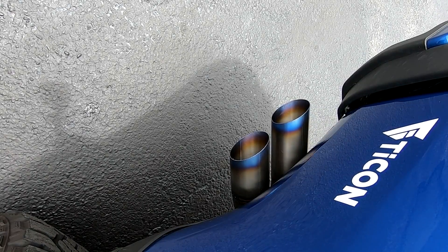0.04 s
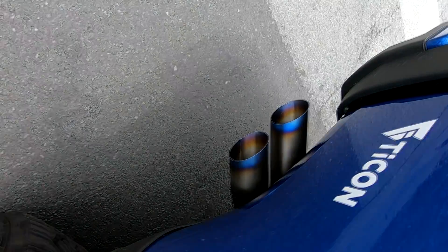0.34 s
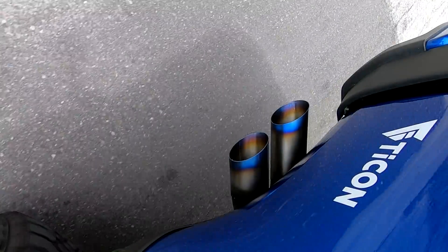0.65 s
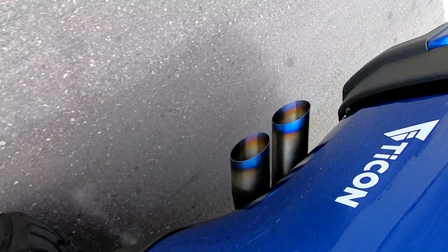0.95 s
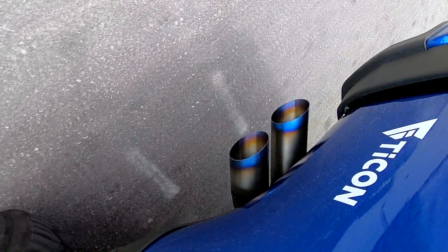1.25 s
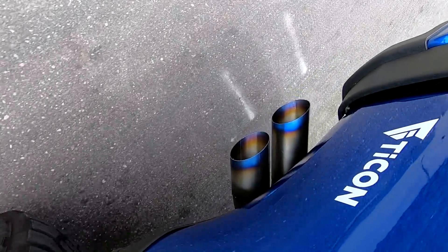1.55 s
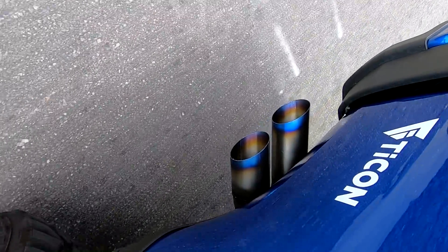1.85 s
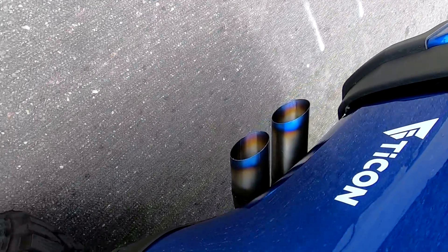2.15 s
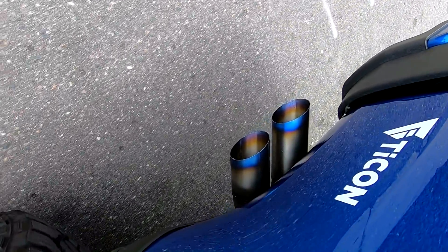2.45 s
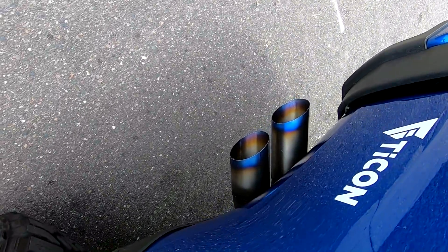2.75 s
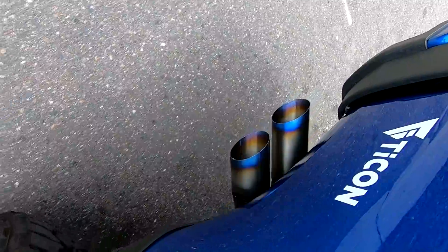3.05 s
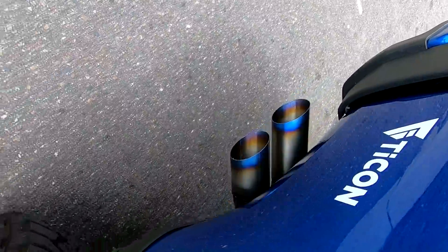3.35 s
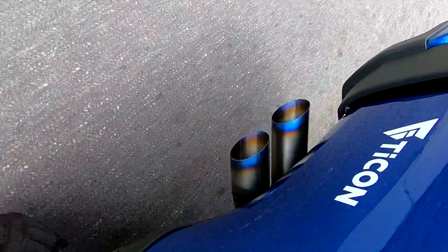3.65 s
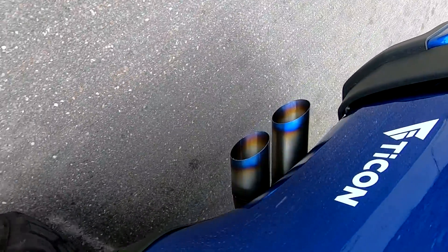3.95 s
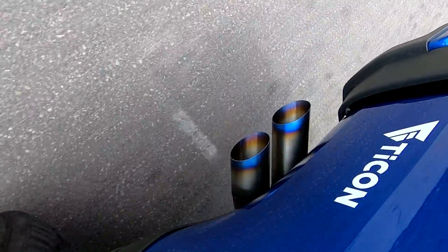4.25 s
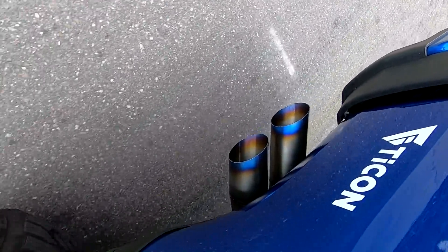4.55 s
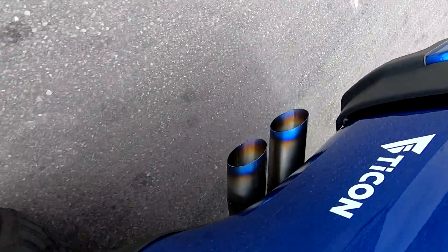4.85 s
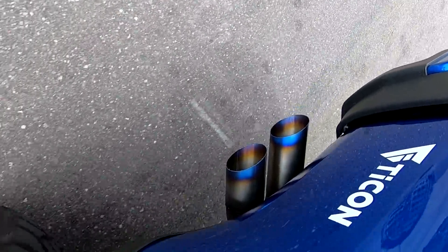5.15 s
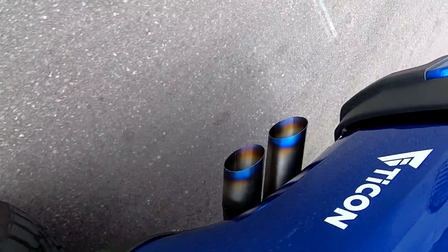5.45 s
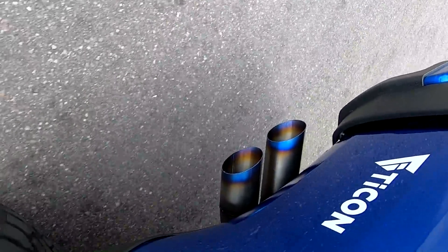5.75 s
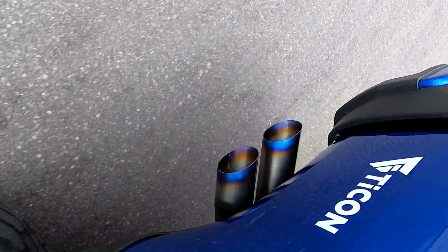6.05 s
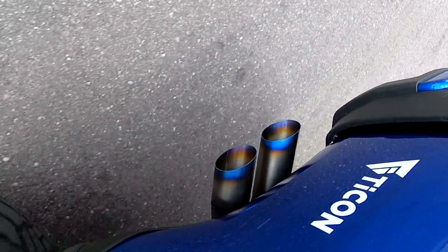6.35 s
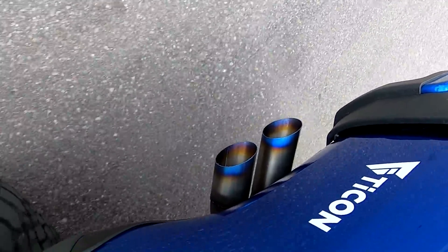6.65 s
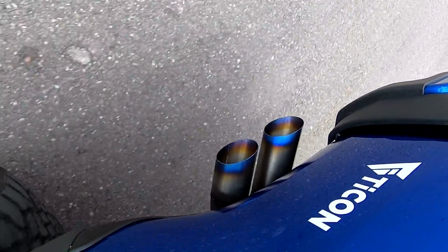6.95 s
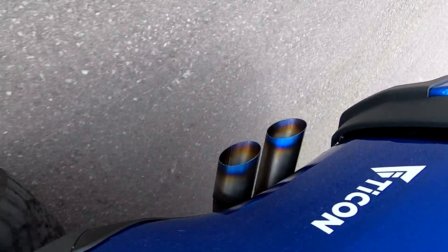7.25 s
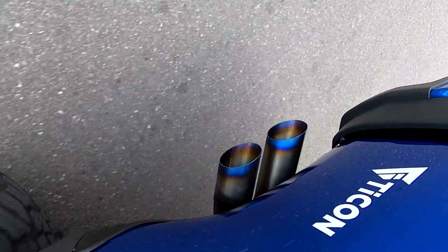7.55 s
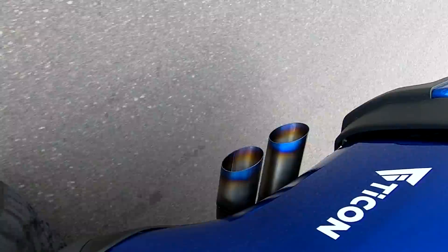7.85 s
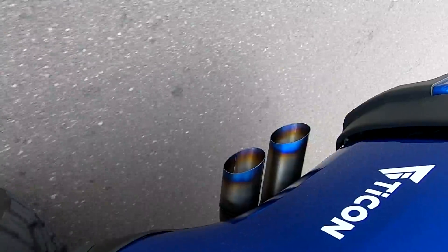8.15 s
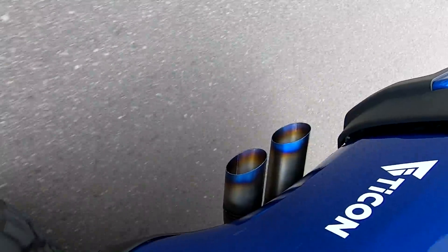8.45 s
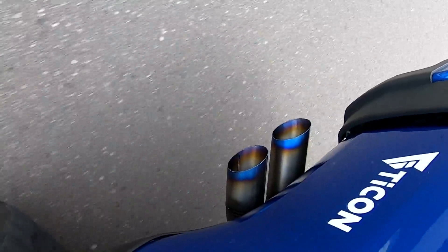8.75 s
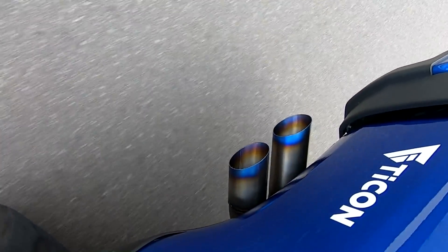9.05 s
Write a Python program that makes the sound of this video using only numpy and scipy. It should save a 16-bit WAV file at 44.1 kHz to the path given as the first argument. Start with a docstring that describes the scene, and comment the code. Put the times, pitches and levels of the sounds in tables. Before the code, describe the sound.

A V8 truck's exhaust drops to a lumpy idle, burbles as it pulls away, then roars at full throttle with a tyre squealing.

```python
"""V8 truck at the tailpipes

Out on the road, a stereo pair of microphones rides just above the twin titanium tailpipes. A held note sounds,
then the scene changes to a lumpy idle; the truck pulls away, eases off once, gathers speed and is floored.
Uneven firings ring the pipes in a boom, burble and bark, with gas and road hissing around them. At full
throttle the rear tyre sticks and slips, squealing to the left."""
import sys
import numpy as np
from scipy import signal
from scipy.fft import rfft, irfft, next_fast_len
from scipy.io import wavfile
from scipy.ndimage import uniform_filter1d

SR = 44100
rng = np.random.default_rng(int(sys.argv[2]) if len(sys.argv) > 2 else 0)


def to_wav(s):
    """Save 16-bit WAV."""
    ch = np.atleast_2d(s).T  # columns
    pcm = np.round(np.clip(ch, -1, 1) * 32767)  # PCM
    wavfile.write(sys.argv[1], SR, pcm.astype(np.int16))


N = 406161
TIME = np.arange(N) / SR

# crank speed: (time [s], speed [rpm])
ENGINE_SPEED = [(0.0, 3090), (0.44, 2845), (0.46, 648), (1.3, 619), (1.8, 561), (3.2, 565), (3.7, 902),
                (3.92, 953), (4.2, 925), (4.55, 835), (4.92, 1027), (5.4, 1096), (6.95, 1238), (7.2, 1347),
                (8.14, 1530), (8.36, 1859), (8.6, 2590), (9.21, 3890)]
# force of the exhaust beat, weak under the held note, then following the throttle: (time [s], gain [dB])
EFFORT = [(0, -24), (.4, -8.5), (.48, -10.5), (.6, -7.5), (.8, -6), (.84, -1.5), (1.3, -0.5), (2.3, -3),
          (3.15, -1), (3.35, -3), (3.6, 3.5), (4.1, -0.5), (4.4, 0), (4.6, -5.5), (4.68, 0.5), (6.3, 0),
          (8.05, -0.5), (8.2, 1.5), (8.38, 4), (8.52, 4.5), (9.21, 1)]
# cylinders in firing order: (strength [dB], lateness [firing intervals])
CYLINDERS = [(1.5, 0), (-2, 0.15), (4.5, .17), (4, .02), (-1.5, .12), (-1.5, -.03), (1, .03), (-4, 0.15)]
# harmonics of the four-stroke cycle; 8 is the firing rate, 16 and 24 its overtones, the rest come from
# each bank's uneven firing: (harmonic [number], at idle [dB], pulling away [dB], at top revs [dB])
BOOM_HARMONICS = [(3, -53.5, -42.5, -18), (4, -56.5, -53.5, -37), (5, -47.5, -30.5, -16.5),
                  (6, -57.5, -57.5, -22), (8, -16, -17, -17), (11, -35.5, -23.5, -24.5),
                  (13, -55.5, -39.5, -29.5), (16, -21.5, -20, -30), (19, -38.5, -34, -30),
                  (24, -23, -37.5, -42.5), (27, -45, -36, -38.5)]
# pipe resonances that the harmonics sweep through: (frequency [Hz], gain [dB])
PIPE_RESONANCES = [(20, -28), (36, 0), (42, -5.5), (60, -11), (73, -8.5), (85, -5), (102, 0.5), (118, 2),
                   (135, -0.5), (150, -4.5), (175, -11), (210, -20.5), (270, -16.5), (310, -1.5),
                   (350, -0.5), (430, -26.5), (700, -29)]
# sidebands the lope gives the firing tones: (harmonic [number], offset [lope rates], level [dB])
LOPE_SIDEBANDS = [(8, 1, -35), (11, 2, -40), (16, -4, -35), (16, -3, -39), (16, -1, -38), (16, 1, -35),
                  (16, 3, -34), (16, 5, -34)]
# overtones of the held note: (harmonic [number], relative level [dB])
HELD_HARMONICS = [(1, -24), (2, -18), (3, 0.5), (4, -22), (5, -4.5), (6, -15.5), (7, -30), (8, -9.5),
                  (9, -34), (10, -20.5), (11, -14.5), (12, -17), (13, -15.5), (14, -7.5), (15, -22.5),
                  (16, -35), (17, -18), (18, -33), (19, -21.5), (20, -23.5), (21, -29.5), (22, -41)]
# the pipe's low passband: (frequency [Hz], gain [dB])
BURBLE_BAND = [(12, -55.5), (32, 7), (55, 13), (75, -4), (95, 21.5), (130, 16.5), (155, 9), (185, 1),
               (260, -69), (900, -110)]
# the pipe's middle passband: (frequency [Hz], gain [dB])
BARK_BAND = [(120, -29), (185, -8.5), (220, -0.5), (255, -7), (303, 3), (335, -5.5), (365, -3.5),
             (425, -6.5), (470, -20), (560, -34), (800, -48.5), (3000, -110)]
# one lope as lead-in, sharp pop, high tail and weaker throb:
# (position [lopes], width [s], pitch at OPEN_RPM [Hz], rise [Hz/s], level [dB])
LOPE_CHUFFS = [(-.18, .013, 312, 300, -29), (-.025, .008, 325, 1100, -26.5), (.26, .017, 415, 900, -35),
               (.43, .017, 308, 300, -31)]
# revs at which the engine lopes: (onset [rpm], full from [rpm], full until [rpm], gone [rpm])
LOPE_RPM = [680, 850, 1560, 1720]
# single strong burns at idle: (time [s], pitch [Hz], level [dB])
IDLE_CHUFFS = [(.7, 300, -32), (.795, 300, -27), (.852, 305, -20.5), (1.012, 305, -29), (1.332, 310, -25.5),
               (1.5, 305, -24), (1.67, 300, -25), (1.85, 295, -26), (2.0, 295, -35), (2.183, 295, -35),
               (2.382, 315, -32), (2.72, 295, -35), (2.908, 305, -33), (3.09, 305, -37), (3.268, 300, -33)]
# the slipping rear tyre: (time [s], pitch [Hz], level [dB])
TYRE_SLIP = [(8.62, 788, -36), (8.654, 717, -19.5), (8.69, 722, -14), (8.73, 728, -14.5), (8.908, 713, -13),
             (9.028, 716, -15), (9.068, 767, -24), (9.108, 716, -15), (9.162, 783, -26),
             (9.184, 740, -16.5), (9.21, 750, -20)]
# rush of gas and road: (time [s], level [dB])
RUSH_LEVEL = [(0.04, -45), (0.55, -51), (0.78, -49.5), (1.24, -53), (2.99, -64), (3.68, -56), (3.89, -59),
              (4.75, -55.5), (8.14, -53), (8.4, -49.5), (8.58, -37), (8.68, -46), (9.01, -48), (9.09, -40),
              (9.11, -44.5), (9.16, -38.5), (9.19, -37.5)]
# low body of the rush: (frequency [Hz], gain [dB])
RUSH_BODY = [(300, 9), (520, 4.5), (700, -1.5), (850, -3.5), (1020, -4.5), (1250, -3.5), (1900, -11.5),
             (3000, -26.5), (6000, -54.5)]
# hiss on top of the rush: (frequency [Hz], gain [dB])
RUSH_HISS = [(900, -4.5), (1900, -1), (3000, -1.5), (4000, -6.5), (5200, -12), (7500, -19.5), (9300, -27),
             (10300, -27.5), (11500, -34.5), (15000, -48)]
# likeness of the noise at the two microphones: (frequency [Hz], correlation [0..1])
MIC_LIKENESS = [(60, 0.88), (150, 0.94), (370, 0.96), (930, 0.72), (2330, 0.88), (5810, 0.65),
                (14500, 0.062)]
# narrow hisses: (peak time [s], length [s], centre [Hz], bandwidth [Hz], level [dB])
SPITS = [(1.053, 1., 2773, 1000, -52), (1.34, 0.33, 7500, 1500, -70.5), (1.895, 0.67, 2098, 1695, -56.5),
         (3.597, 0.43, 4170, 897, -65.5)]
# grit striking the bodywork: (time [s], level [dB])
GRIT_STRIKES = [(4.497, -58), (4.617, -53), (5.358, -56), (5.931, -55), (6.645, -52)]
# colour of one strike: (frequency [Hz], gain [dB])
GRIT_SPECTRUM = [(500, -13), (1300, -5), (4000, -5), (6500, -9), (10000, -24), (15000, -55)]

IDLE_RPM, PULL_RPM, OPEN_RPM, TOP_RPM = 584, 960, 1230, 3550  # pulses harden between idle and open
LOPES_PER_CYCLE, FIRST_CHUFF_S = 1.197, .85  # an uneven burn, about six times in five cycles
HELD_END_S, HELD_FADE_S = .33, .13  # the held note fades out as the scene changes to the idle


def boom(cycles, rpm):
    """Low harmonics and the lope's sidebands swell as the revs carry them across the pipe's resonances."""
    tones = 0
    for k, *levels_db in BOOM_HARMONICS:
        db = np.interp(np.log(rpm), np.log([IDLE_RPM, PULL_RPM, TOP_RPM]), levels_db)
        tones += amp(db + read(PIPE_RESONANCES, k * rpm / 120)) * sine(k * cycles)
    for k, offset, db in LOPE_SIDEBANDS:
        hz = (k + offset * LOPES_PER_CYCLE) * rpm / 120
        sideband = sine(k * cycles + offset * lope_count(cycles) + .25)
        tones += loping(rpm) * amp(db + read(PIPE_RESONANCES, hz)) * sideband
    after_held_note = np.clip((TIME - HELD_END_S - HELD_FADE_S) / .02, 0, 1)
    return amp(curve(EFFORT)) * after_held_note * tones


def held_note(cycles, level_db=-18, sag_db_per_s=4):
    """At near-steady revs the firings repeat closely and the overtones stand clear."""
    tones = sum(amp(db + .5 * wander(hz=9)) * sine(k * cycles + rng.random()) for k, db in HELD_HARMONICS)
    holding = np.clip(1 - (TIME - HELD_END_S) / HELD_FADE_S, 0, 1)
    return amp(level_db - sag_db_per_s * TIME) * holding * tones


def firings(cycles, scatter_db, jitter_s):
    """Sample index and force of each firing: the cylinder's own character plus the chance of the burn."""
    count = np.arange(int(cycles[-1] * len(CYLINDERS)))
    db, late = np.array(CYLINDERS)[count % len(CYLINDERS)].T
    burn, jitter = rng.standard_normal((len(count), 2)).T
    times = np.interp((count + late) / len(CYLINDERS), cycles, TIME) + jitter_s * jitter
    return np.clip(np.round(times * SR).astype(int), 0, N - 1), amp(db + scatter_db * burn)


def burble(cycles, rpm, level_db=-26.5, db_per_octave=-1.5, even_burn_db=2.5):
    """Strong and weak burns push the pipe's low resonances; the burble drops as they even out under load."""
    at, force = firings(cycles, scatter_db=4.5, jitter_s=.0005)
    uneven = .3 * unit(force - force.mean()) + rng.uniform(-.91, 1, len(at))
    ring = steady(pipe(np.bincount(at, uneven, N), BURBLE_BAND), samples=1500)
    revs_db = db_per_octave * np.log2(rpm / OPEN_RPM) - even_burn_db * load(rpm)
    return amp(level_db + .39 * curve(EFFORT) + revs_db) * ring


def bark(cycles, rpm, level_db=-25.5, idle_db=-7, db_per_octave=-.5, idle_edge_hz=328, full_flow_db=-49.5):
    """Each pulse and the puff behind it ring the pipe; idle pulses are softer-edged and puffier."""
    at, force = firings(cycles, scatter_db=5, jitter_s=.00022)
    pull = load(rpm)
    pulses = np.bincount(at, force, N)
    puffs = decay(pulses, seconds=.018) * rng.standard_normal(N)
    puffiness = 2.4 - 1.4 * pull
    sharp = pipe(unit(pulses) + puffiness * unit(puffs), BARK_BAND)
    soft = shaped(sharp, lambda f: 1 / np.sqrt(1 + (f / idle_edge_hz) ** 8))
    ring = steady(soft + pull * (sharp - soft), samples=1400)
    effort_db = .87 * curve(EFFORT) + .31 * np.minimum(curve(RUSH_LEVEL) - full_flow_db, 0)
    revs_db = db_per_octave * np.log2(rpm / OPEN_RPM) + idle_db * (1 - pull)
    # the bark gives way to the lope, and at high revs to clean harmonics
    give_way_db = 6 * loping(rpm) + np.interp(rpm, [1550, 1900], [0, 5])
    return amp(level_db + effort_db + revs_db - give_way_db) * ring


def lope(cycles, rpm, uneven_db=2, jitter_s=.00022, drift_hz=5):
    """Under load the chuffs run together into a rolling beat, each one whooping upwards."""
    count, lope_hz = lope_count(cycles), LOPES_PER_CYCLE * rpm / 120
    beat = 0
    for position, width, hz, rise, db in LOPE_CHUFFS:
        from_centre_s = ((count - position + .5) % 1 - .5) / lope_hz + jitter_s * wander(drift_hz)
        pitch = hz * (rpm / OPEN_RPM) ** .11
        beat += amp(db + uneven_db * wander(drift_hz)) * chuff(from_centre_s, pitch, width, rise)
    return amp(.19 * curve(EFFORT)) * loping(rpm) * (TIME > FIRST_CHUFF_S) * beat


def idle_chuffs(width_s=.012, rise_hz_per_s=800):
    """At idle the strong burns stand apart as single round chuffs."""
    return sum(amp(db) * chuff(TIME - s, hz, width_s, rise_hz_per_s) for s, hz, db in IDLE_CHUFFS)


def chuff(t, hz, width_s, rise_hz_per_s):
    """A rounded burst of the pipe's ring, centred on t = 0 and bending upwards."""
    return np.exp(-(t / width_s) ** 2) * sine(hz * t + rise_hz_per_s * t ** 2 / 2)


def tyre_squeal(cycles, shudder_db=1.5, shudder_bend=.011, left_db=.5, right_db=-8):
    """Tread blocks stick and slip in step and sing, shuddering each engine cycle, or break into a scrub."""
    shudder = np.cos(2 * np.pi * cycles)
    turns = np.cumsum(curve(TYRE_SLIP) * (1 + .01 * wander(hz=60) + shudder_bend * shudder)) / SR
    level_db = curve(TYRE_SLIP, column=2)
    lock = np.interp(level_db, [-28.5, -13.5], [.58, 1])  # the louder the tread, the cleaner it sings
    octave = unit(sine(2 * turns) + .45 * noise_band(2 * turns, half_width_hz=20))
    tone = amp(.7) * sine(turns) + lock ** 2 * amp(-15.5) * octave
    shake = amp(.6 * wander(hz=50) + shudder_db * shudder)
    scrub = noise_band(1.1 * turns, half_width_hz=86)
    squeal = np.sqrt(lock) * tone * shake + np.sqrt(1 - lock) * scrub
    return squeal * amp(level_db) * during(TYRE_SLIP) * amp([[left_db], [right_db]])


def rush(cycles, rpm, flutter_db=.5, lean_db=1.15):
    """Gas and road noise, throbbing faintly with the firings and gaining body with revs and effort."""
    body_db = 9.5 + 6 * rpm / TOP_RPM + .27 * curve(EFFORT)
    noise = amp(body_db) * stereo_noise(RUSH_BODY) + amp(1) * stereo_noise(RUSH_HISS)
    throb = 1 + .033 * np.cos(2 * np.pi * len(CYLINDERS) * cycles)
    level_db = curve(RUSH_LEVEL) + flutter_db * wander(hz=31)
    return noise * throb * amp(level_db) * amp([[lean_db], [-lean_db]])


def buffet(rpm, level_db=-35.5, low_hz=45, edge_hz=101):
    """Low air turbulence, different at each microphone, growing slightly with the revs."""
    noise = rng.standard_normal((2, N))
    gusts = shaped(noise, lambda f: f / np.hypot(f, low_hz) / (1 + (f / edge_hz) ** 3))
    return amp(level_db) * (rpm / rpm.mean()) ** .082 * unit(gusts)


def spits():
    """Faint, narrow hisses swell and fade midway between the microphones."""
    return sum(amp(db) * np.exp(-(2 * (TIME - s) / length) ** 2) * noise_band(hz * TIME, width / 2)
               for s, length, hz, width, db in SPITS)


def grit_ticks():
    """Grit from the road ticks against the bodywork."""
    times, db = np.transpose(GRIT_STRIKES)
    strikes = np.bincount(np.round(times * SR).astype(int), amp(db), N)
    return decay(strikes, seconds=.011) * stereo_noise(GRIT_SPECTRUM)


def load(rpm):
    """Zero at idle, one once the engine pulls."""
    return np.clip((rpm - IDLE_RPM) / (OPEN_RPM - IDLE_RPM), 0, 1)


def loping(rpm):
    """One at the low revs where the pulling engine lopes, zero at idle and at high revs."""
    return np.interp(rpm, LOPE_RPM, [0, 1, 1, 0])


def lope_count(cycles):
    """The running count of lopes since the first one."""
    return LOPES_PER_CYCLE * (cycles - np.interp(FIRST_CHUFF_S, TIME, cycles))


def pipe(x, passband, size=16384):
    """Rings x through a minimum-phase passband, so the ring follows each pulse."""
    log_gain = np.log(amp(read(passband, abs(np.fft.fftfreq(size, 1 / SR)))))
    ring = np.fft.ifft(np.exp(np.conj(signal.hilbert(log_gain)))).real
    return signal.oaconvolve(x, ring[:size // 2])[:N]


def stereo_noise(spectrum):
    """Coloured noise, partly alike at the two microphones."""
    common, apart = rng.standard_normal((2, N))
    mid = shaped(common, lambda f: amp(read(spectrum, f)) * np.sqrt(1 + read(MIC_LIKENESS, f)))
    side = shaped(apart, lambda f: amp(read(spectrum, f)) * np.sqrt(1 - read(MIC_LIKENESS, f)))
    return np.array([mid + side, mid - side]) / mid.std()


def noise_band(turns, half_width_hz):
    """A narrow band of noise around a running phase."""
    angle = 2 * np.pi * turns
    return wander(half_width_hz) * np.cos(angle) + wander(half_width_hz) * np.sin(angle)


def wander(hz):
    """Random drift of rms 1, rolling off above hz."""
    return unit(shaped(rng.standard_normal(N), lambda f: 1 / (1 + (f / hz) ** 4)))


def sine(turns):
    """A tone of rms 1 on a running phase."""
    return np.sqrt(2) * np.cos(2 * np.pi * turns)


def decay(pulses, seconds):
    """Gives each pulse an exponential tail."""
    return signal.lfilter([1], [1, -np.exp(-1 / (seconds * SR))], pulses)


def steady(x, samples):
    """Evens out slow changes of power and keeps the single beats."""
    power = uniform_filter1d(uniform_filter1d(x ** 2, samples), samples)
    return x / np.sqrt(abs(power) + 1e-14)


def shaped(x, gain):
    """Filters by a gain given as a function of frequency."""
    size = next_fast_len(N)
    return irfft(rfft(x, size) * gain(np.fft.rfftfreq(size, 1 / SR)), size)[..., :N]


def read(spectrum, hz):
    """A spectrum's value at hz, joined by straight lines over log frequency."""
    f, value = np.transpose(spectrum)
    return np.interp(np.log(hz + 1), np.log(f + 1), value)


def curve(rows, column=1):
    """One column of a table, joined by straight lines in time."""
    rows = np.array(rows)
    return np.interp(TIME, rows[:, 0], rows[:, column])


def during(rows, fade_s=.022):
    """One while a table lasts, fading to zero outside it."""
    start, end = rows[0][0], rows[-1][0]
    return np.interp(TIME, [start - fade_s, start, end, end + fade_s], [0, 1, 1, 0])


def amp(db):
    """Decibels to gain."""
    return 10 ** (np.asarray(db) / 20)


def unit(x):
    """Scales to rms 1."""
    return x / np.sqrt(np.mean(x ** 2) + 1e-20)


def scene():
    """The exhaust close below the microphones, leaning slightly left under load, amid tyre, air and road."""
    rpm = curve(ENGINE_SPEED)
    cycles = np.cumsum(rpm / 120) / SR  # one four-stroke cycle is two turns of the crank
    exhaust = boom(cycles, rpm) + held_note(cycles) + burble(cycles, rpm) + bark(cycles, rpm)
    exhaust += lope(cycles, rpm) + idle_chuffs()
    lean = amp(load(rpm) * [[.25], [-.25]])
    return exhaust * lean + tyre_squeal(cycles) + rush(cycles, rpm) + buffet(rpm) + spits() + grit_ticks()


def record(dry):
    """Soft ends, then the recorder's 15 kHz band limit."""
    ends = signal.windows.tukey(N, .0012)
    lowpass = signal.firwin(511, 15000, window=("kaiser", 9), fs=SR)
    return signal.oaconvolve(dry * ends, lowpass[None], "same")


dry = scene()
out = record(dry)
to_wav(out)
```